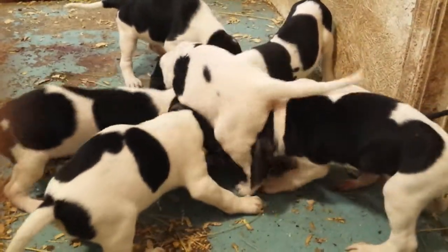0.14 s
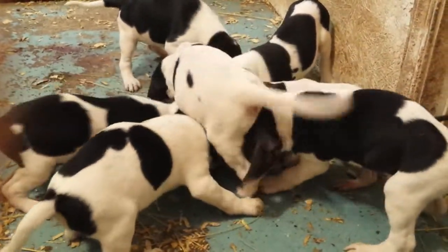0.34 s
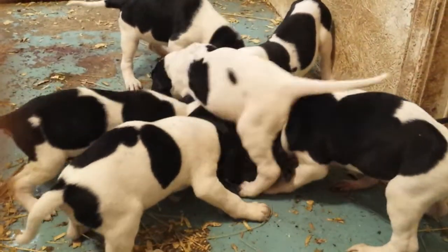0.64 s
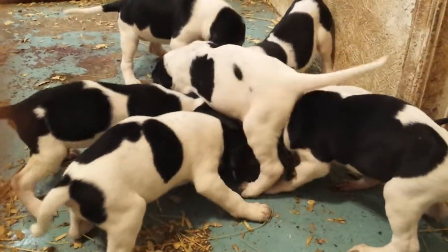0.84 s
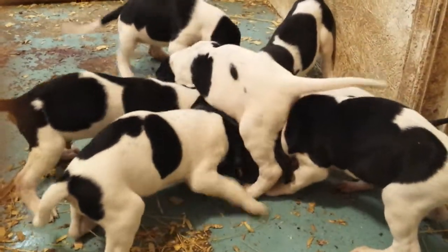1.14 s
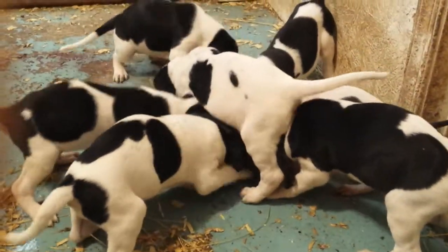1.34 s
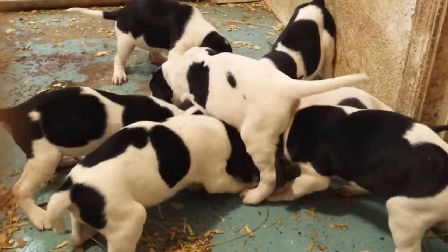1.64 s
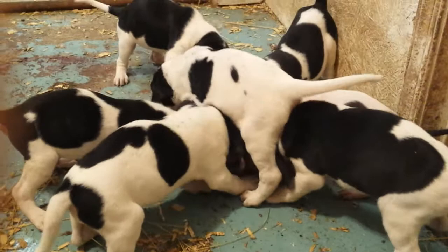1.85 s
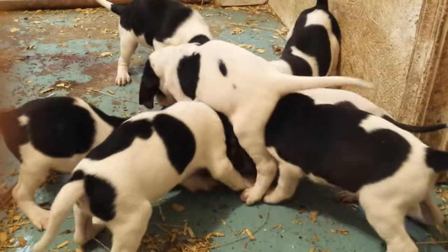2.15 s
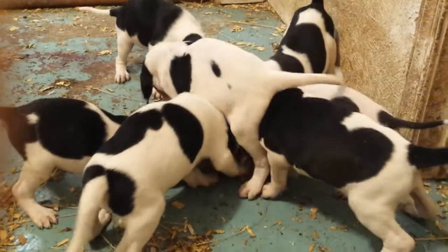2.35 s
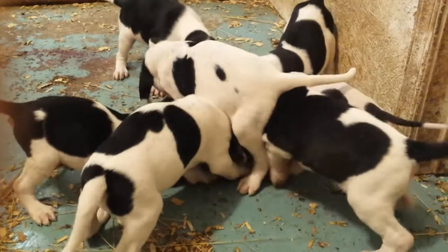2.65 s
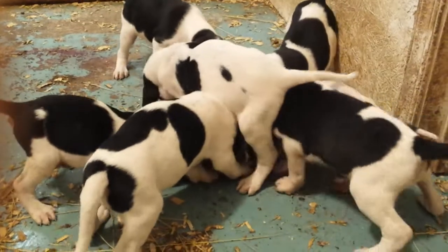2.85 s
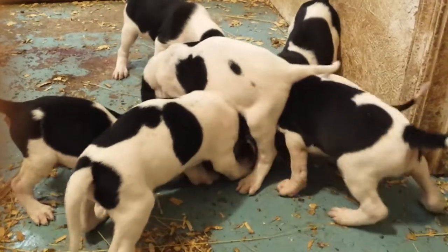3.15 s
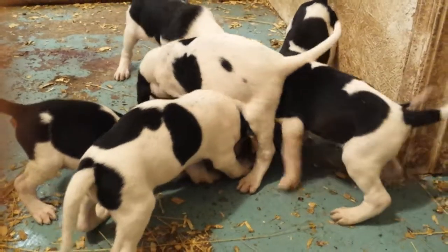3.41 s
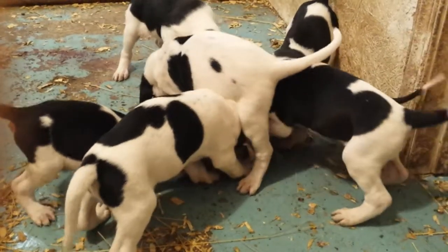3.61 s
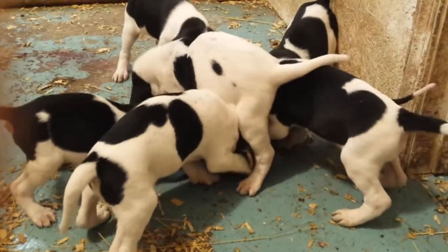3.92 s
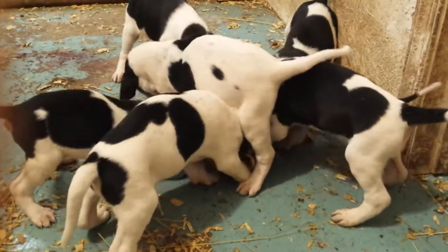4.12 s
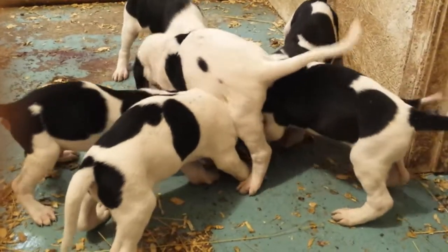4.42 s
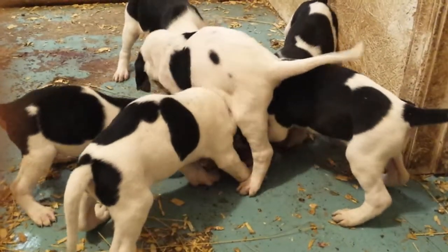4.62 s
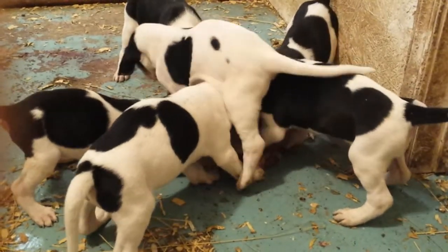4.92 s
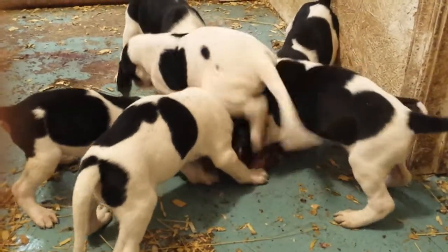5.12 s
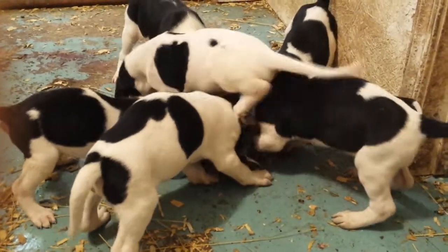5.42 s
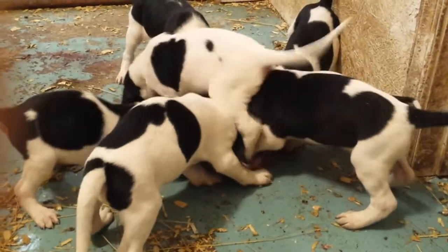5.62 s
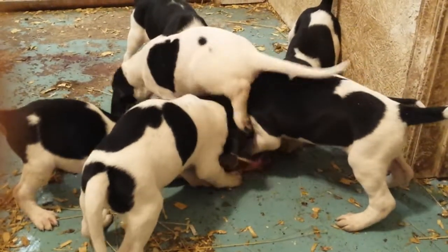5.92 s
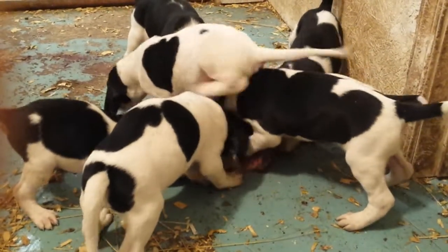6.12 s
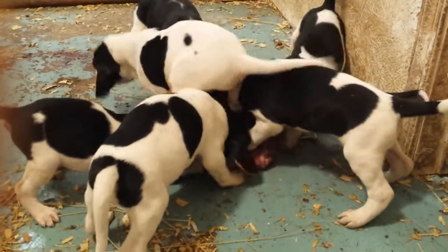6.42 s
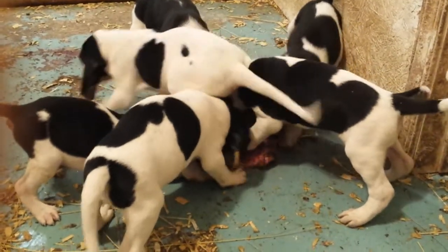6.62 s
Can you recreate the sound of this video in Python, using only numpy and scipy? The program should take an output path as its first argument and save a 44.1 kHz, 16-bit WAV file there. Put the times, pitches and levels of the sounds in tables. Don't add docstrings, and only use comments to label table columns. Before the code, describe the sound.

Indoors in a small hard-walled pen, a phone a metre or two away picks up puppies crowding over food. At 0 s a rustle burst, short whimpers and a thin nose squeak start together. Claws tick and bone taps the boards; a wavering whine comes at 0.6-0.8 s with a small yelp, and a louder rising yelp at 1.15 s. The sharpest snap cracks at 1.6 s, followed by a brief whine at 1.8 s. From 2 to 3.8 s it is mostly ticks, knocks, soft thumps and crackling shavings, with faint hoarse grunts. Two whines overlap near 3.9-4.1 s. At 5.0-5.35 s a whine creeps up, then a louder one falls. Short yelps and whines flick at 5.8-6 s, whimpers cluster at 6.25-6.4 s, and knocks and a fading level whine end it by 6.8 s. Faint hum and short bright echoes persist throughout.

```python
import sys
import numpy as np
from scipy import signal
from scipy.fft import rfft, irfft
from scipy.io import wavfile
from scipy.ndimage import uniform_filter1d

SR = 44100
rng = np.random.default_rng(int(sys.argv[2]) if len(sys.argv) > 2 else 0)


def generate_wav(sig):
    pcm = np.round(np.clip(np.atleast_2d(sig).T, -1, 1) * 32767).astype(np.int16)
    wavfile.write(sys.argv[1], SR, pcm)


def amplitude_ratio(level_db):
    exponent = np.asarray(level_db, float) / 20
    return 10 ** exponent


N = 298116
T = np.arange(N) / SR

# pitch_hz, level_db
HUM_COLOUR = [(12, -43), (20, -9.5), (59, -5.5), (205, -13.5), (263, -7), (302, -17.5), (357, -11.5),
              (484, -21.5), (656, -9.5), (796, -39), (9900, -23), (12000, -31), (15000, -24.5)]
# pitch_hz, likeness_0_to_1
PORT_LIKENESS = [(60, 0.55), (300, 0.79), (700, 0.46), (1400, 0.011), (3000, 0.05), (7000, 0.0072)]
# pitch_hz, left_minus_right_db
PORT_COLOUR = [(100, 0.5), (1300, 2), (2400, -0.5), (4400, 0.5), (6500, 1.5), (8500, -13.5), (13000, -1.5)]
# pitch_hz, t60_s
PEN_T60 = [(300, 0.35), (700, 0.57), (2000, 0.38), (6000, 0.2), (12000, .25)]
# pitch_hz, ring_over_direct_db
PEN_LEVEL = [(200, -5), (400, 6), (700, 3.5), (2000, 6.5), (6000, -1.5), (12000, 6)]
# pitch_hz, level_db
SHAVINGS_COLOUR = [(530, -32), (900, -7.5), (966, -5), (1850, -42), (2130, -12.5), (3170, -7), (4360, -1),
                   (5320, -2.5), (6280, 4.5), (8040, -1.5), (8940, -18), (14000, -32.5), (15000, -43)]
# pitch_hz, level_db
SCUFF_COLOUR = [(250, -5), (500, -0.5), (900, -1.5), (1400, -1), (2200, -5.5), (3500, -36)]
# start_s, level_db
STIRRING = [(0, -42), (.15, -46.5), (.46, -56.5), (.75, -44), (.92, -51), (1.3, -53), (1.49, -60),
            (1.85, -47), (2.0, -49), (2.11, -65.5), (2.42, -52), (3.3, -51), (4.0, -43), (4.45, -58.5),
            (4.9, -51.5), (5.25, -44), (5.6, -62), (6.76, -41)]
# start_s, peak_db, rise_s, fade_s
SHUFFLES = [(0, -28, .002, 0.033), (.39, -44.5, 0.046, 0.028), (.98, -45.5, 0.023, 0.2),
            (1.17, -40, 0.034, 0.077), (1.35, -44.5, 0.02, 0.068), (1.599, -36, 0.016, 0.044),
            (2.24, -58, 0.093, 0.041), (2.39, -54, 0.011, .1), (2.86, -41.5, 0.064, 0.028),
            (3.37, -43.5, 0.039, .1), (3.65, -56, .02, 0.024), (4.389, -50, 0.12, 0.0067),
            (4.59, -44.5, 0.012, 0.054), (5.44, -42, 0.057, 0.11), (5.78, -45.5, 0.093, 0.37),
            (5.7, -58, 0.0088, 0.087), (6.02, -42.5, 0.036, 0.039), (6.59, -43, 0.073, 0.011),
            (0.252, -42.5, 0.0071, 0.064), (2.7, -53, 0.18, 0.027)]
# start_s, peak_db, pitch_hz
PAW_THUMPS = [
    (1.152, -37.5, 243),
    (1.584, -64, 226),
    (2.386, -46, 115),
    (3.32, -36, 143),
    (4.642, -39, 217),
    (5.372, -41.5, 216),
    (6.199, -58.5, 88.5),
]
# start_s, peak_db, pitch_hz
BOARD_KNOCKS = [(0.345, -38.5, 1560), (0.353, -32.5, 1110), (0.586, -33, 715), (1.035, -33, 1290),
                (1.098, -35, 697), (2.227, -50, 950), (2.812, -44.5, 2150), (2.862, -32.5, 1046),
                (3.464, -51, 930), (3.871, -39, 760), (4.534, -44.5, 1210), (4.999, -34, 740),
                (6.232, -45.5, 1500), (6.448, -35, 1190), (6.59, -28, 726), (6.729, -31, 756)]
# start_s, peak_db, ring_hz
CLAWS = [(.244, -33.5, 3370), (.68, -33.5, 8720), (.757, -31, 7900), (1.3364, -29, 6150),
         (2.447, -37, 7500), (2.4707, -32.5, 4520), (2.521, -29.5, 6590), (2.984, -46, 8640),
         (3.1797, -32, 7800), (3.262, -27, 7200), (3.3617, -28.5, 6280), (3.653, -29.5, 6170),
         (3.7364, -26, 6270), (4.352, -37.5, 7300), (4.5867, -32.5, 6300), (4.7084, -37, 5440),
         (4.8087, -42, 5480), (5.227, -31, 3230), (5.3941, -27.5, 6060), (5.6002, -31.5, 5200),
         (5.72, -34, 6450), (5.7566, -34, 7400), (5.781, -55, 6740), (6.033, -35, 3650), (6.108, -61, 6450),
         (6.1404, -36, 5950), (6.162, -28.5, 5740), (6.4014, -32.5, 6760), (6.561, -27, 6700)]
# start_s, peak_db, ring_hz
SNAPS = [(0.4827, -30.5, 7250), (0.9543, -29, 4470), (0.98, -33, 6600), (1.1374, -31, 8200),
         (1.363, -31, 7080), (1.506, -28, 6360), (1.5562, -27, 6400), (1.5901, -14, 6240),
         (2.227, -35, 5800), (2.8627, -25, 4180), (3.2981, -32.5, 6560), (3.3374, -41, 5700),
         (3.5886, -27.5, 4240), (3.6341, -27.5, 7300), (4.8693, -34.5, 6870), (5.0149, -31.5, 6480),
         (5.8347, -40, 4540), (6.5804, -25, 5430)]
# pitch_hz, level_db
CRACK_COLOUR = [(1000, -12), (3000, -0.5), (6500, 3.5), (8500, -5), (10500, -8), (15000, -36)]
# start_s, length_s, pitch_hz, level_db
NOSE_WHISTLES = [
    (.027, 0.051, 7180, -25),
    (0, 0.027, 4250, -34.5),
    (-0.5, .014, 11000, -46),
    (5, .035, 8200, -53),
    (4, 0.027, 8500, -45),
]
# pitch_hz, level_db
THROAT = [(1500, -25), (2200, -58.5), (2900, -39), (3600, -32.5), (4400, -30), (5300, -49), (6200, -36),
          (7000, -27.5), (8000, -29), (9000, -57)]
# pitch_hz, level_db
SECOND_THROAT = [(900, -13), (1500, -21), (2100, -36), (2700, -42.5), (3500, -27.5), (4300, -37.5),
                 (5200, -59), (6500, -38), (7800, -43), (9000, -68)]
# start_s, pitch_hz, level_db, second_partial_db
WHINES = [
    [(1.762, 584, -32.5, -32.5), (1.777, 562, -25.5, -34), (1.8, 706, -28, -37), (1.82, 661, -39.5, -53),
     (1.845, 681.4, -28, -37.5), (1.86, 680, -40, -48)],
    [(3.898, 737, -45, -36), (3.912, 711, -28, -65), (3.95, 704.5, -32.5, -52), (3.985, 698.3, -30.5, -45),
     (4.03, 661, -36.5, -39.5), (4.07, 634, -37.5, -57)],
    [(5.015, 696, -33, -48), (5.035, 717, -30, -46), (5.06, 751.7, -38.5, -50.5), (5.11, 740, -31.5, -47.5),
     (5.145, 755, -40.5, -50), (5.172, 778, -34, -61)],
    [(5.176, 756.5, -35, -43), (5.198, 744, -33, -47), (5.212, 662, -27.5, -46), (5.24, 645, -26.5, -39),
     (5.265, 623.5, -23, -46), (5.285, 584, -20.5, -43), (5.305, 590.4, -34, -59),
     (5.325, 560.4, -21.5, -50), (5.345, 573, -33, -45)],
]
# brightness_db, left_minus_right_db
WHINE_TONES = [(-1, 4), (-5, .3), (2, 1.5), (-3.5, 2)]
# start_s, pitch_hz, level_db, second_partial_db
MORE_WHINES = [
    [(0.645, 767, -33, -40), (0.66, 671, -34, -35.5), (0.7, 720, -28.5, -40), (0.726, 668, -43, -42),
     (0.74, 643, -26.5, -24.5), (0.764, 646.3, -35, -51), (0.775, 652.5, -27.5, -55),
     (0.8, 699.3, -26.5, -35.5), (0.84, 629, -32, -49)],
    [(3.92, 884, -45, -41), (3.935, 897, -27, -43.5), (3.96, 842, -39, -39), (4.015, 813.6, -36, -48),
     (4.045, 757, -46, -34)],
    [(5.846, 503, -29.5, -43), (5.867, 641, -24, -47.5), (5.878, 705, -31.5, -45), (5.892, 630, -25, -51)],
    [(5.957, 913, -44, -70), (5.975, 863, -45, -57), (6.002, 773, -39.5, -61)],
    [(6.605, 796, -47, -65), (6.615, 784, -29, -59), (6.655, 794.6, -39, -48), (6.672, 792, -46, -51),
     (6.72, 772, -47, -56)],
]
# brightness_db, left_minus_right_db
MORE_WHINE_TONES = [(5.5, 3), (14, -0.5), (-5, 1), (-3, -7), (-10, 3)]
# start_s, length_s, first_pitch_hz, last_pitch_hz, top_level_db
YELPS = [
    (0.593, 0.063, 422, 578.5, -32.5),
    (1.123, 0.033, 297, 317, -48),
    (1.142, .056, 443, 548.6, -23.5),
    (5.824, 0.0318, 288, 393, -35.5),
]
# start_s, length_s, pitch_hz, level_db, second_over_first_db
WHIMPERS = [
    (0, 0.045, 730, -32.5, -16.5),
    (0, 0.025, 826, -32.5, -16),
    (3.864, 0.029, 713, -40.5, -13),
    (6.254, 0.025, 465, -38, -18),
    (6.276, 0.027, 612, -29, -16.5),
    (6.313, 0.024, 612, -33.5, -34),
    (6.348, 0.029, 230, -41.5, -20),
]
# start_s, length_s, pitch_hz, level_db, second_over_first_db
GRUNTS = [
    (3.258, 0.024, 280, -48.5, -22),
    (3.492, 0.043, 536.3, -38.5, -12.5),
    (4.638, 0.066, 556.4, -41, -20),
    (4.642, 0.05, 382, -49, -25),
]


def on_log(table, hz):
    f, v = np.transpose(table)
    return np.interp(np.log(np.maximum(hz, 1)), np.log(f), v)


def colour(x, table_db):
    n = x.shape[-1]
    hz = np.arange(n // 2 + 1) * SR / n
    return irfft(rfft(x) * amplitude_ratio(on_log(table_db, hz)), n)


def unit(x):
    return x / np.sqrt(np.mean(x ** 2))


def walk(rate, size=N):
    k = max(int(SR / rate), 2)
    steps = np.repeat(rng.standard_normal(size // k + 1), k)
    return 1.58 * uniform_filter1d(uniform_filter1d(steps, k), k)[:size]


def diffuse(size):
    mid, side = rfft(rng.standard_normal((2, size)))
    hz = np.arange(size // 2 + 1) * SR / size
    likeness = np.clip(on_log(PORT_LIKENESS, hz), 0, 1)
    shared = mid * np.sqrt(1 + likeness)
    differing = side * np.sqrt(1 - likeness)
    return irfft([shared + differing, shared - differing], size) / np.sqrt(2)


def band_share(hz, centre, bands_per_octave):
    distance = bands_per_octave * np.log2(np.maximum(hz, 1) / centre)
    return np.cos(np.pi / 2 * np.clip(distance, -1, 1)) ** 2


def add(out, x, s):
    i = int(max(s, 0) * SR)
    out[i:i + len(x)] += x[:len(out) - i]


def hum():
    return amplitude_ratio(-59) * unit(colour(diffuse(N), HUM_COLOUR)) * amplitude_ratio(0.8 * walk(4))


def pen():
    size = 32768
    t = np.arange(size) / SR
    hz = np.arange(size // 2 + 1) * SR / size
    noise = rfft(diffuse(size))
    out = 0
    for centre in 100 * 2. ** np.arange(8):
        band = irfft(noise * band_share(hz, centre, 1), size)
        fade = np.exp(-np.log(1000) * t / on_log(PEN_T60, centre))
        out = out + band * fade * amplitude_ratio(on_log(PEN_LEVEL, centre)) / np.sqrt(np.sum(fade ** 2))
    return out * np.clip((t - 0.003) / 0.0044, 0, 1)


def grains(rate, fade_s):
    size = (rng.random(N) < rate / SR) * amplitude_ratio(rng.uniform(-12, 0, N))
    return unit(signal.lfilter([1], [1, -np.exp(-1 / (fade_s * SR))], size))


def stirring():
    power = amplitude_ratio(2 * np.interp(T, *np.transpose(STIRRING)))
    for s, db, rise, fade in SHUFFLES:
        power = power + amplitude_ratio(2 * db) * np.exp(-2 * np.abs(T - s) / np.where(T < s, rise, fade))
    return 10 * np.log10(power)


def rustle():
    db = stirring()
    hz = np.arange(N // 2 + 1) * SR / N
    hiss = rfft(colour(diffuse(N), SHAVINGS_COLOUR))
    shared = grains(66, 0.0096) + 0.52 * grains(300, 0.0013)
    crackle = 0
    for centre in 800 * 2 ** np.arange(0, 4.6, 0.5):
        band = irfft(hiss * band_share(hz, centre, 2), N)
        grit = 0.5 + 0.3 * shared + 0.28 * grains(64, 0.014)
        crackle = crackle + band * grit * amplitude_ratio(2.55 * walk(14))
    scuff = unit(colour(diffuse(N) * (0.32 + 0.64 * grains(40, 0.026)), SCUFF_COLOUR))
    scuff_db = -56.5 + 0.93 * (db + 48)
    return unit(crackle) * amplitude_ratio(db) + scuff * amplitude_ratio(scuff_db)


def thumps():
    out, t = np.zeros(N), np.arange(4096) / SR
    envelope = np.exp(-t / 0.0072) * (1 - np.exp(-t / 0.0012))
    for s, db, hz in PAW_THUMPS:
        add(out, amplitude_ratio(db) * np.sin(2 * np.pi * hz * t) * envelope, s)
    return out


def knocks():
    out, t = np.zeros(N), np.arange(1024) / SR
    envelope = np.exp(-t / 0.0035) * (1 - np.exp(-t / 0.00069))
    for s, db, hz in BOARD_KNOCKS:
        turn = 2 * np.pi * hz * t
        modes = np.sin(turn) + 0.5 * np.sin(1.2 * turn) + 0.5 * np.sin(0.736 * turn)
        add(out, amplitude_ratio(db) * 1.23 * modes * envelope, s)
    return out


def ticks(table, low_db):
    out, t = np.zeros((N, 2)), np.arange(1024) / SR
    onset = np.minimum(t / 0.00065, 1)
    for s, db, hz in table:
        noise = rng.standard_normal((3, 1024))
        crack = 0.36 * unit(colour(noise[:2], CRACK_COLOUR)) * np.exp(-t / 0.0032)
        ring = 0.5 * np.sin(2 * np.pi * hz * t + noise[:2, :1]) * np.exp(-t / 0.0027)
        knock = 0.56 * amplitude_ratio(low_db) * unit(colour(noise[2], SCUFF_COLOUR)) * np.exp(-t / 0.0036)
        add(out, (amplitude_ratio(db) * (crack + ring + knock) * onset).T, s)
    return out.T


def whistles():
    out = np.zeros(N)
    for s, length, hz, db in NOSE_WHISTLES:
        t = np.arange(int(length * SR)) / SR
        waver = 1 + 0.015 * walk(190, size=SR)[:len(t)]
        wave = np.sin(2 * np.pi * np.cumsum(hz * waver) / SR)
        add(out, amplitude_ratio(db) * wave * np.sin(np.pi * t / length) ** 0.5, s)
    return out


def calls(tables, roughs, pans, throat):
    out = np.zeros((N, 2))
    for table, rough, pan_db in zip(tables, roughs, pans):
        s, *columns = np.transpose(table)
        t = np.arange(s[0], s[-1], 1 / SR)
        hz, db, second_db, bright_db = (np.interp(t, s, c) for c in columns)
        shake = walk(252, size=SR)[:len(t)]
        flutter = walk(300, size=SR)[:len(t)]
        turn = 2 * np.pi * np.cumsum(hz * (1 + 0.2114 * rough * shake)) / SR
        x = amplitude_ratio(db) * np.sin(turn) + amplitude_ratio(second_db) * np.sin(2 * turn)
        upper_db = db.max() + 0.25 * (db - db.max()) + bright_db
        for k in range(3, 22):
            patchy_db = 3.2 * walk(45, size=len(t))
            strength = amplitude_ratio(upper_db + patchy_db + on_log(throat, k * hz)) * (k * hz < 9500)
            x += strength * np.sin(k * turn + k * k)
        edge = np.clip(np.minimum((t - s[0]) / 0.0038, (s[-1] - t) / 0.013), 0, 1)
        uneven = 1 + rough * (2.0 * flutter + 0.24 * np.cos(turn / 2))
        sides = amplitude_ratio([pan_db / 2, -pan_db / 2])
        add(out, np.outer(np.sqrt(2) * x * edge * uneven, sides), s[0])
    return out.T


def whimper(s, length, hz, db, second_db, bright_db):
    attack_s = 0.008
    t = np.array([0, attack_s, length])
    sag_db = -130 * (t - attack_s) * (t > 0)
    level_db = db + sag_db - 1 * (t == 0)
    pitch_hz = hz * 2 ** (-0.41 * t)
    return np.transpose([s + t, pitch_hz, level_db, level_db + second_db, bright_db + 0 * t])


def yelp(s, length, first_hz, last_hz, db):
    t = s + length * np.array([0, 0.82, 1])
    hz = np.array([first_hz, last_hz, last_hz])
    level_db = db + 23.5 * np.log2(hz / last_hz)
    second_db = level_db - 29 * np.log2(hz / 369)
    return np.transpose([t, hz, level_db, second_db, -2.5 + 0 * hz])


def whine(table, bright_db):
    return [(*row, bright_db) for row in table]


def puppies():
    short = [whimper(*r, bright_db=-4) for r in WHIMPERS]
    short += [whimper(*r, bright_db=2) for r in GRUNTS]
    short += [yelp(*r) for r in YELPS]
    roughs = [0.07] * len(WHIMPERS) + [0.26] * len(GRUNTS) + [0.18] * len(YELPS)
    out = calls(short, roughs, [1.3] * len(short), THROAT)
    whiners = ((WHINES, WHINE_TONES, THROAT), (MORE_WHINES, MORE_WHINE_TONES, SECOND_THROAT))
    for tables, tones, throat in whiners:
        bright_db, pan_db = np.transpose(tones)
        long = [whine(table, bright) for table, bright in zip(tables, bright_db)]
        out = out + calls(long, [0.045] * len(tables), pan_db, throat)
    return out


def scene():
    voices = puppies() + whistles()
    hits = ticks(CLAWS, low_db=-41) + ticks(SNAPS, low_db=-8) + knocks() + thumps()
    send = amplitude_ratio(-4) * voices.mean(axis=0) + amplitude_ratio(-6.0) * hits[0]
    ring = signal.fftconvolve(send[None], pen(), axes=1)[:, :N]
    return amplitude_ratio(-0.5) * voices + hits + ring + rustle() + hum()


def band_limit(x):
    return signal.sosfilt(signal.butter(12, 14740, fs=SR, output="sos"), x)


def record(dry):
    left = colour(dry[0], [(hz, db / 2) for hz, db in PORT_COLOUR])
    right = colour(dry[1], [(hz, -db / 2) for hz, db in PORT_COLOUR])
    top_cut = signal.ellip(10, 0.2, 80, 14750, fs=SR, output="sos")
    mix = signal.sosfilt(top_cut, [left, right])
    return band_limit(mix)


dry = scene()
out = record(dry)
generate_wav(out)
```